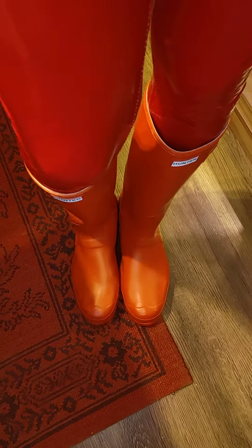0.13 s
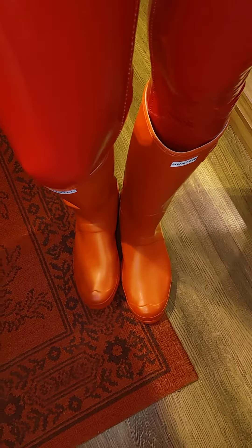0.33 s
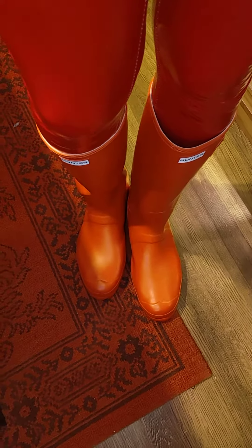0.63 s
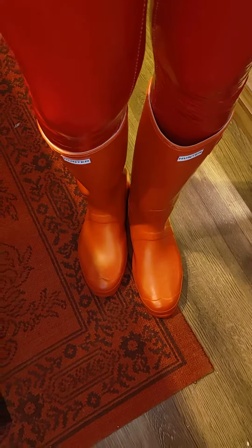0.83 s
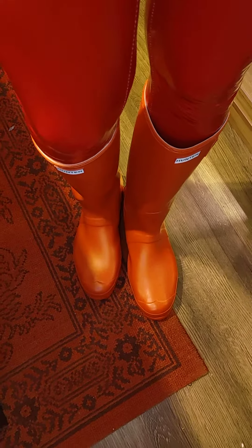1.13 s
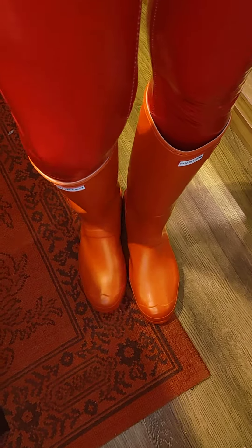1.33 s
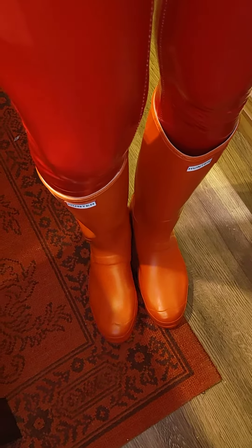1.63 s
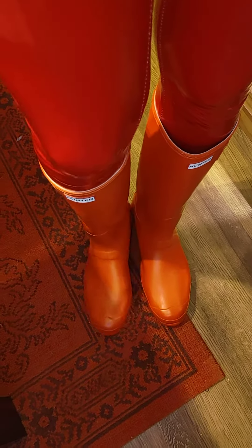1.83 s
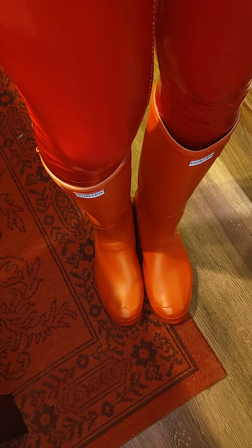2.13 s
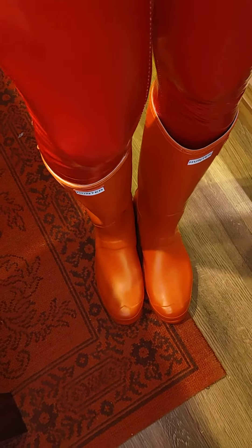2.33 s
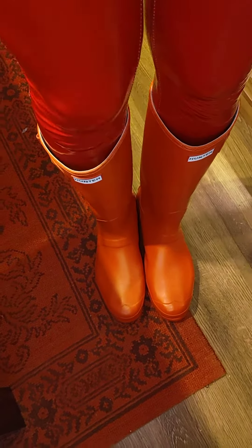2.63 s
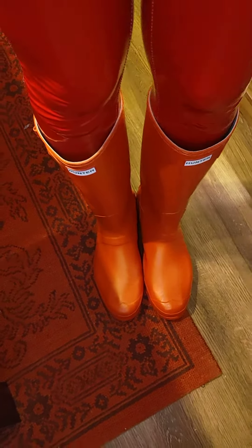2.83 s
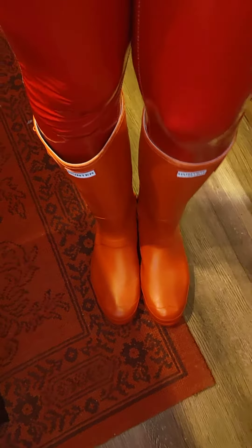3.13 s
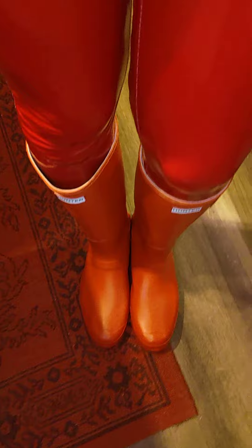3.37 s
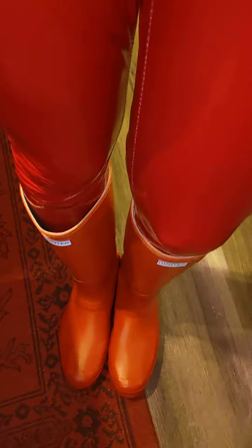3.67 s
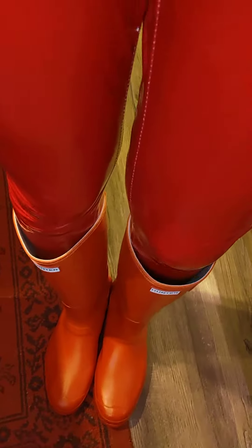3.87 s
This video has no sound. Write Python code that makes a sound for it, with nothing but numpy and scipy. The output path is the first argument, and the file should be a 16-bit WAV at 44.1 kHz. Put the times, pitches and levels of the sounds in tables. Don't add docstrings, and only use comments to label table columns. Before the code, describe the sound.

Latex-clad legs shift inside rubber boots on a rug: crackle and yelping squeak first, sparse soft squeaks, then thumps, wobbling squeaks and one loud snap near the end; small quiet room, phone at chest height.

```python
import sys
import numpy as np
from scipy import signal
from scipy.fft import rfft, irfft
from scipy.io import wavfile
from scipy.ndimage import uniform_filter1d

SR = 44100
rng = np.random.default_rng(int(sys.argv[2]) if len(sys.argv) > 2 else 0)


def pcm_store(signal):
    levels = np.round(np.clip(np.atleast_2d(signal), -1, 1) * 32767)
    wavfile.write(sys.argv[1], SR, levels.astype(np.int16).T)


def amplitude_ratio(level_db):
    exponent = np.asarray(level_db, float) / 20
    return 10 ** exponent


N = 176400


def colour(x, table):
    hz, db = np.array(table).T
    f = np.maximum(np.arange(N // 2 + 1) * SR / N, 1)
    gain = amplitude_ratio(np.interp(np.log(f), np.log(hz), db, left=-90, right=-90))
    y = irfft(rfft(x) * gain, N)
    return y / np.sqrt(np.mean(y ** 2))


def band(x, hz, width):
    return signal.lfilter(*signal.iirpeak(hz, hz / width, SR), x)


def walk(rate):
    hold = int(SR / rate)
    steps = np.repeat(rng.standard_normal(N // hold + 1), hold)
    return uniform_filter1d(steps, hold)[:N]


def gate(t0, t1, attack, release):
    t = np.arange(N) / SR
    return np.clip((t - t0) / attack, 0, 1) * np.exp(-np.maximum(t - t1, 0) / release)


# f/Hz, level/dB per Hz
AIR_TONE = [(12, -42), (20, -15.5), (59, -2.5), (234, -15), (457, -21.5), (588, -22.5), (822, -37),
            (1090, -32), (15900, -46)]


def air():
    mid, side = (colour(rng.standard_normal(N), AIR_TONE) for _ in range(2))
    side = signal.lfilter(*signal.butter(1, 1030, "high", fs=SR), side)
    level = amplitude_ratio(-63.5 + 1.0 * walk(6.66))
    return level * (mid + side * np.array([[1], [-1]]))


def grains():
    grains_per_s, scatter_db = 9000, 2
    hits = rng.random(N) < grains_per_s / SR
    size_db = scatter_db * np.minimum(rng.exponential(size=N), 4)
    return hits * rng.standard_normal(N) * amplitude_ratio(size_db)


# t/s, level/dB
SLIDE = [(0.0, -55.5), (.7, -61.5), (0.842, -58.5), (0.902, -74), (1.2, -68), (1.36, -62.5), (1.9, -70.5),
         (2.098, -61.5), (2.25, -84), (2.498, -71), (2.6, -59), (3.2, -61), (3.481, -60), (3.529, -75.5),
         (3.7, -48.5), (3.84, -62), (4.0, -52.5)]
# start t/s, length t/s, level/dB
RUBS = [(0.0, 0.015, -54), (0.271, 0.067, -49.5), (0.418, 0.021, -51), (2.052, 0.0096, -59.5),
        (2.174, 0.018, -68), (0.632, 0.085, -52.5), (1.224, 0.064, -57.5), (1.505, 0.043, -63),
        (1.645, 0.1, -62), (1.769, 0.1, -58.5), (2.452, 0.014, -59.5), (2.577, 0.043, -51.5),
        (3.592, 0.0094, -49), (3.657, 0.061, -71)]
# start t/s, length t/s, level/dB
SWEEPS = [
    (3.207, 0.022, -56),
    (3.245, 0.027, -47.5),
    (3.298, 0.11, -54),
    (3.862, 0.082, -53.5),
    (0.294, 0.033, -45),
    (1.251, 0.047, -57.5),
]
# f/Hz, level/dB per Hz
SLIDE_TONE = [(120, 7.5), (200, -4), (722, -3), (1620, -10), (2170, -5), (5330, -15), (6760, -10),
              (9060, -26), (16000, -24)]
# f/Hz, level/dB per Hz
RUB_TONE = [(1470, -7), (2500, -24), (2830, -13), (5650, -12), (7250, 5), (8530, -10.5), (10300, -10.5),
            (16000, -25.5)]
# f/Hz, level/dB per Hz
SWEEP_TONE = [(2500, 1), (4500, 0.5), (7500, 4), (9000, -3.5), (12000, -4.5), (16000, -12)]


def rustle():
    attack_s, release_s = 0.018, 0.02
    s, db = np.array(SLIDE).T
    slide_db = np.interp(np.arange(N) / SR, s, db) + 0.5 + walk(4.3)
    out = colour(grains(), SLIDE_TONE) * amplitude_ratio(slide_db)

    bright = colour(grains(), RUB_TONE) * amplitude_ratio(3 * walk(250))
    dark = band(grains(), 1120, 1800)
    rub = bright + amplitude_ratio(-9.5) * dark / dark.std()
    airy = colour(grains(), SWEEP_TONE)
    for sound, strokes in ((airy, SWEEPS), (rub, RUBS)):
        for t0, length, db in strokes:
            out = out + sound * amplitude_ratio(db) * gate(t0, t0 + length, attack_s, release_s)
    return out * amplitude_ratio(walk(60))


def patchy(x):
    centres = 200 * np.sqrt(2) ** np.arange(14)
    return sum(band(x, hz, hz / 2) * amplitude_ratio(4.5 * walk(20)) for hz in centres)


# t/s, peak level/dB, treble level/dB against the
SNAPS = [(0.0054, -30.5, 6.5), (0.0119, -22, -8), (0.018, -21, -12), (.048, -36.5, -20), (0.064, -42, 4),
         (3.362, -39, 6), (2.5204, -34.5, -3), (2.5496, -34.5, -11), (2.6703, -19, -6.5),
         (2.7364, -40.5, 11.5), (2.7411, -26.5, -3), (2.7533, -30, -28), (2.9246, -32, -3),
         (3.0244, -37, -15), (3.2575, -17.5, -3), (3.3945, -20, -2),
         (3.6603, -8, 1),
         (2.2783, -43, -13), (2.0732, -47, 3), (2.4657, -57, 7), (3.22, -34.5, -11), (3.2546, -27, 8),
         (3.5467, -45.5, -9), (3.5987, -42, -21), (3.6685, -22, -20), (3.6759, -19, -15), (3.684, -22, -27),
         (3.753, -50, 0), (1.913, -53.5, 14), (2.803, -53, 4), (2.819, -58, 5),
         (3.65, -33, -3),
]
# f/Hz, width f/Hz, level/dB
SNAP_BRIGHT = [(4600, 1200, -5), (7000, 1500, 0), (10300, 2000, -9), (13500, 3000, -16)]


def snaps():
    size = 4096
    out, t = np.zeros(N + size), np.arange(size) / SR
    mid_hz, mid_width = 2080, 1580
    shape = np.exp(-t / .00035) + amplitude_ratio(-20) * np.exp(-t / .005)
    for s, db, treble_db in SNAPS:
        crack = shape * rng.standard_normal(size)
        mid = band(band(crack, mid_hz, mid_width), mid_hz, 2 * mid_width)
        tear = shape * rng.standard_normal(size)
        top = sum(amplitude_ratio(part_db) * band(band(tear, hz, width), hz, width) for hz, width, part_db in SNAP_BRIGHT)
        snap = mid / np.abs(mid).max() + amplitude_ratio(treble_db) * top / np.abs(top).max()
        i = int(s * SR)
        out[i:i + size] += amplitude_ratio(db) * snap
    return out[:N]


# t/s, peak level/dB, f/Hz
THUMPS = [(0.014, -24, 467), (0.039, -33.5, 990), (0.122, -37.5, 515), (0.796, -37, 453),
          (1.199, -35.5, 810), (1.213, -38.5, 920), (1.39, -39, 603), (1.913, -42.5, 862),
          (2.057, -40, 664), (2.279, -43, 183), (2.518, -27.5, 284), (2.534, -47, 407), (2.726, -37, 685),
          (2.551, -30, 283), (2.572, -31, 278), (2.589, -32.5, 218), (2.736, -26, 344), (2.92, -29, 178),
          (2.946, -30, 256), (2.975, -32, 193), (3.016, -36, 490), (3.546, -36, 450), (3.62, -31, 483),
          (3.682, -31, 580),
          (2.072, -39, 100),
    (2.67, -26.5, 170),
    (3.6583, -12.5, 1230),
    (3.663, -29, 218),
    (3.976, -33, 90),
          (2.918, -31.5, 205), (2.964, -31, 276), (2.981, -37, 223), (2.987, -41, 210), (2.996, -34, 196),
            (3.022, -37, 486), (3.687, -30, 760), (3.697, -32, 690), (3.704, -39, 694), (3.711, -33, 620),
            (3.717, -35, 668), (3.723, -45, 556), (3.728, -29, 396)]


def thumps():
    size, lag_s, knock_hz = 2048, .0015, 900
    out, t = np.zeros(N + 4096), np.arange(size) / SR

    def pop(hz):
        cycles = .8 + hz / knock_hz
        fade = np.exp(1 - 2 * t * hz / cycles)
        return np.sin(2 * np.pi * hz * t) * fade * np.minimum(t * hz, 1)

    for s, db, hz in THUMPS:
        i = int((s + lag_s) * SR)
        knock = pop(knock_hz * np.exp(rng.standard_normal() / 4))
        out[i:i + size] -= amplitude_ratio(db) * (pop(hz) + amplitude_ratio(-6) * knock)
    return out[:N]


# start t/s, end t/s, first slip rate f/Hz, last slip rate f/Hz, level/dB
CREAKS = [
    (1.228, 1.272, 190, 620, -50.5),
    (2.455, 2.7, 930, 250, -62),
    (2.59, 2.66, 200, 210, -57.5),
    (1.99, 2.21, 1500, 2300, -61),
    (2.68, 2.79, 400, 190, -59),
    (.02, 0.11, 220, 130, -56.5),
]
# f/Hz, width f/Hz, level/dB
SHAFT = [(560, 720, 3.5), (900, 410, -3.5), (1690, 77, 0), (3430, 190, -42)]


def creaks():
    t, slips = np.arange(N) / SR, 0
    for t0, t1, hz0, hz1, db in CREAKS:
        rate = np.exp(np.interp(t, [t0, t1], np.log([hz0, hz1])))
        uneven = np.exp(.07 * walk(300))
        turns = np.cumsum(rate * (t > t0) * (t < t1) * uneven) / SR
        clicks = np.diff(np.floor(turns), prepend=0) / np.sqrt(rate / SR)
        slips = slips + clicks * amplitude_ratio(db + 2.5 * walk(250)) * gate(t0, t1, 0.0058, 0.0027)
    out = 0
    for hz, width, db in SHAFT:
        wide = width * 1.03
        out = out + amplitude_ratio(db) * band(band(slips, hz, wide), hz, wide)
    return 5 * out


# t/s, slip rate f/Hz, level/dB
SQUEAK_A = [(0.28, 1078, -64), (0.29, 1053, -47.5), (0.35, 1133, -53.5)]
# t/s, slip rate f/Hz, level/dB
SQUEAK_B = [(0.31, 1117, -40), (0.325, 1670, -38.5), (0.346, 3210, -48.5)]
# t/s, slip rate f/Hz, level/dB
SQUEAK_C = [(1.656, 4894, -67), (1.668, 2860, -62), (1.685, 2015, -54.5), (1.702, 1691, -54.5),
            (1.73, 1517, -63), (1.76, 1003, -59.5), (1.788, 524, -52.5)]
# t/s, slip rate f/Hz, level/dB
SQUEAK_D = [(1.791, 520, -49), (1.805, 619, -56), (1.825, 817, -49.5), (1.845, 899, -55),
            (1.867, 880, -51.5), (1.877, 693, -58), (1.89, 873, -58), (1.93, 862, -64.5)]
# t/s, slip rate f/Hz, level/dB
SQUEAK_E = [(3.212, 520, -40), (3.25, 574, -47.5), (3.265, 768, -56), (3.288, 722, -40.5),
            (3.308, 589, -40), (3.332, 757, -39), (3.357, 802, -40)]
# t/s, slip rate f/Hz, level/dB
SQUEAK_F = [(3.358, 728, -41.5), (3.423, 724.7, -41.5), (3.529, 568, -71.5)]
# t/s, slip rate f/Hz, level/dB
SQUEAK_G = [(3.857, 600, -45), (3.868, 605, -35), (3.882, 581, -45.5), (3.888, 654, -44.5),
            (3.912, 729, -36), (3.922, 800, -43), (3.934, 667, -34), (3.94, 710, -48)]
# t/s, slip rate f/Hz, level/dB
SQUEAK_H = [(2.17, 705, -45), (2.187, 1093, -54.5), (2.196, 699, -55.5), (2.251, 456, -68.5)]
# t/s, slip rate f/Hz, level/dB
SQUEAK_I = [(3.692, 662.7, -51), (3.731, 557.5, -40), (3.744, 492, -44.5), (3.83, 434, -58.5)]
# t/s, slip rate f/Hz, level/dB
SQUEAK_J = [(1.268, 750, -34.5), (1.28, 1069, -43.5), (1.303, 2320, -55.5)]
# t/s, slip rate f/Hz, level/dB
SQUEAK_K = [(.71, 1500, -70), (0.719, 1004, -41), (.77, 595, -55.5)]
# t/s, slip rate f/Hz, level/dB
SQUEAK_L = [(3.859, 900, -45.5), (3.884, 900, -37), (3.898, 1024, -39), (3.917, 994, -36),
            (3.928, 1043, -53), (3.945, 807, -43), (3.955, 914, -42), (3.976, 1035, -40.5),
            (4.0, 1006, -60)]
# t/s, slip rate f/Hz, level/dB
SQUEAK_M = [(.395, 4250, -62), (.408, 4200, -60), (.421, 4150, -63)]
# t/s, slip rate f/Hz, level/dB
SQUEAK_N = [(3.399, 449.7, -42.5), (3.43, 425.3, -52), (3.471, 449, -50.5), (3.52, 471, -54.5)]
# t/s, slip rate f/Hz, level/dB
SQUEAK_O = [(2.457, 708, -55), (2.471, 1055, -53), (2.489, 900, -67)]
# roughness (0-1), overtone level/dB
SQUEAK_KIND = [(.02, -1), (.03, -14), (.012, -9), (.03, -7), (.03, -8), (.11, -3), (.07, -13), (.08, -8),
               (.2, -13), (.05, -9), (.16, -11), (.05, -9), (.02, -30), (.15, -10), (.05, -12)]


def squeaks():
    t, out = np.arange(N) / SR, 0
    tables = (SQUEAK_A, SQUEAK_B, SQUEAK_C, SQUEAK_D, SQUEAK_E, SQUEAK_F, SQUEAK_G, SQUEAK_H,
              SQUEAK_I, SQUEAK_J, SQUEAK_K, SQUEAK_L, SQUEAK_M, SQUEAK_N, SQUEAK_O)
    throb_hz = 190 * np.exp(.4 * walk(120))
    throb = np.cos(2 * np.pi * np.cumsum(throb_hz) / SR)
    for table, (rough, over_db) in zip(tables, SQUEAK_KIND):
        s, hz, db = np.array(table).T
        rate = np.interp(t, s, hz) * (1 + rough * walk(500))
        phase = 2 * np.pi * np.cumsum(rate) / SR
        tone = np.sin(phase)
        for k in range(3):
            tone = tone + amplitude_ratio(over_db - 9 * k) * np.sin((k + 2) * phase)
        level = amplitude_ratio(np.interp(t, s, db) + 2.5 * walk(150))
        throbbing = 1 + min(5 * rough, 1) * throb
        out = out + tone * level * throbbing * gate(s[0], s[-1], 0.0023, 0.0024)
    return out


def walls(near):
    size = 16384
    t = np.arange(size) / SR
    fade = np.exp(-np.log(1000) * t / .22) * (t > .003)
    mid, side = rng.standard_normal((2, size)) * fade
    side = signal.lfilter(*signal.butter(1, 250, "high", fs=SR), side)
    tail = signal.lfilter([1], [1, -.5], mid + side * np.array([[1], [-1]]))
    tail = signal.lfilter(*signal.butter(2, 300, "high", fs=SR), tail)
    tail = tail / np.sqrt(np.sum(tail[0] ** 2))
    return signal.fftconvolve(near[None], tail, axes=1)[:, :N]


# t/s, left minus right level/dB
BOOT_PAN = [(0, 5), (.5, 2), (1.3, 2.5), (2.1, -1), (2.5, 4), (3.15, 2), (3.22, 0), (3.82, -2.5),
            (3.86, -5.5), (4, -2)]
# f/Hz, lead (radians)
PORTS = [(200, 0), (800, -1.1), (2300, -1.7), (3500, 1.3)]


def two_ports(boots, legs):
    half = np.array([[.5], [-.5]])
    pan_db = np.interp(np.arange(N) / SR, *np.array(BOOT_PAN).T)
    hz, lead = np.array(PORTS).T
    f = np.maximum(np.arange(N // 2 + 1) * SR / N, 1)
    turn = np.exp(1j * np.interp(f, hz, lead) * half)
    boot_side = rfft(boots * amplitude_ratio(pan_db * half)) * turn
    leg_side = rfft(legs * amplitude_ratio(1 * half)) / turn
    return irfft(boot_side + leg_side, N)


def scene():
    still_air = air()
    legs = patchy(rustle()) / 2
    boots = snaps() + thumps() + creaks() + squeaks()
    return two_ports(boots, legs) + amplitude_ratio(-9.5) * walls(boots + legs) + still_air


def roll_off(x):
    return signal.sosfilt(signal.butter(12, 16990, fs=SR, output="sos"), x)


def record(dry):
    heard = dry - 0.56 * band(dry, 2950, 830)
    top_cut = signal.butter(10, 16000, fs=SR, output="sos")
    return roll_off(signal.sosfilt(top_cut, heard))


dry = scene()
out = record(dry)
pcm_store(out)
```